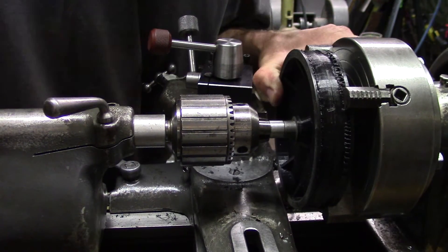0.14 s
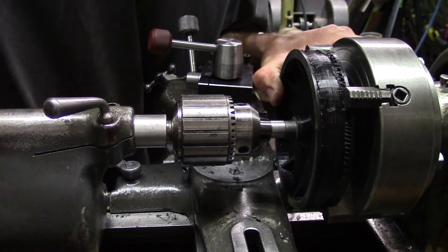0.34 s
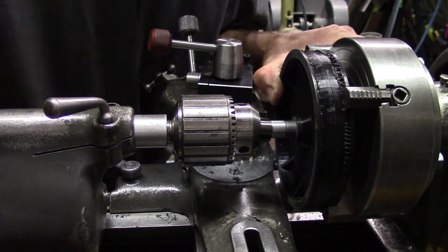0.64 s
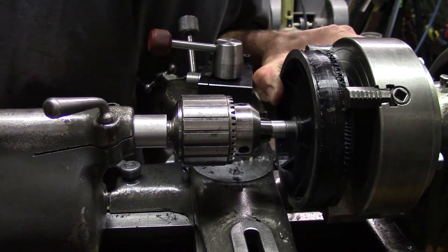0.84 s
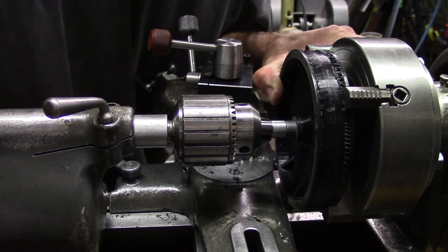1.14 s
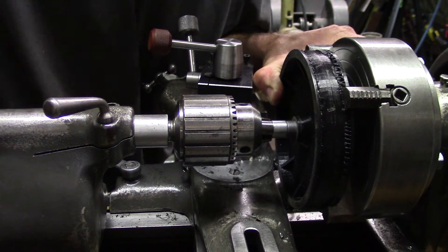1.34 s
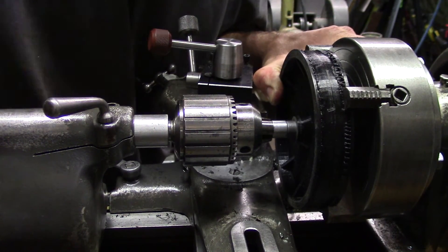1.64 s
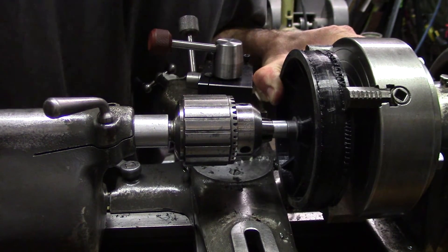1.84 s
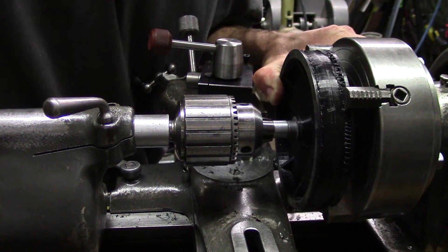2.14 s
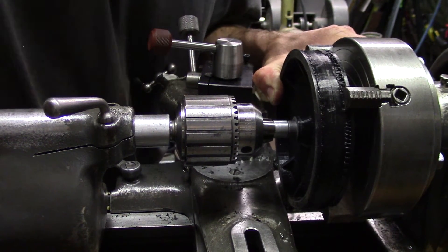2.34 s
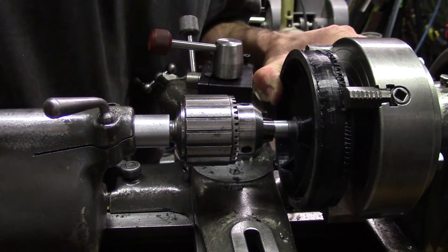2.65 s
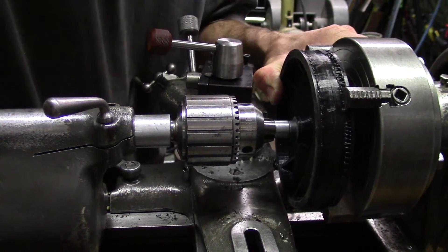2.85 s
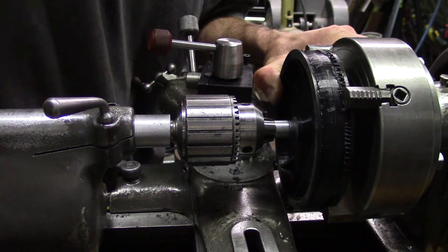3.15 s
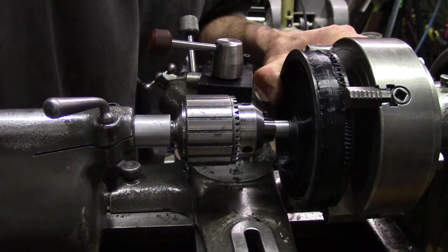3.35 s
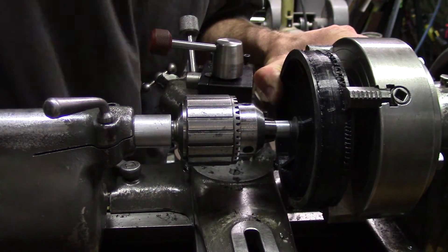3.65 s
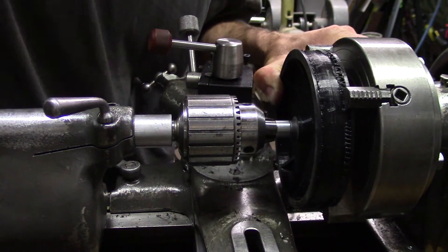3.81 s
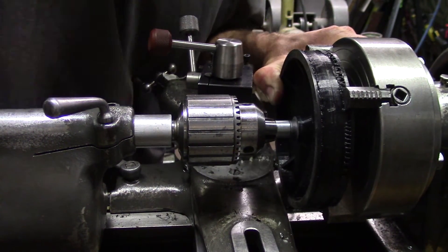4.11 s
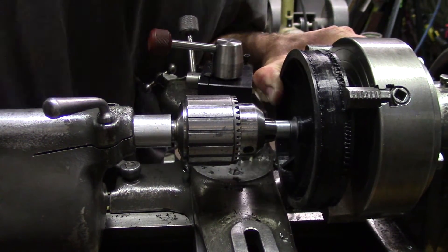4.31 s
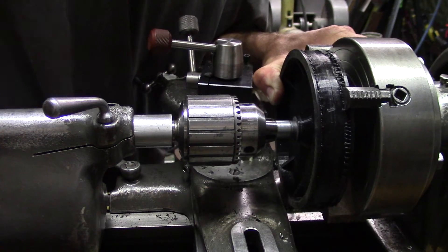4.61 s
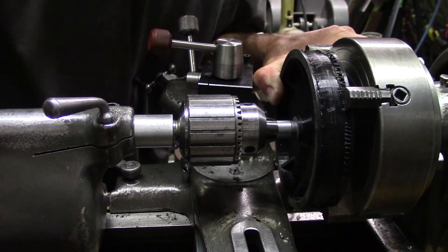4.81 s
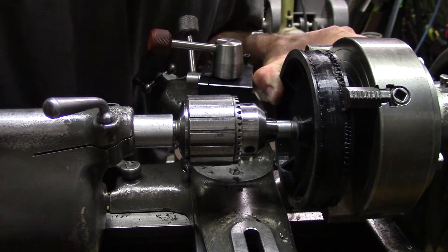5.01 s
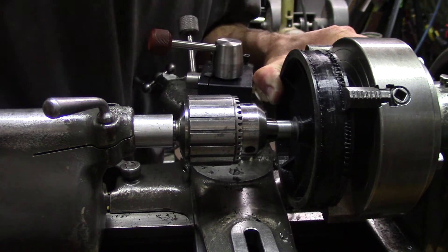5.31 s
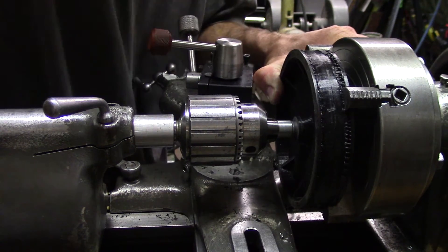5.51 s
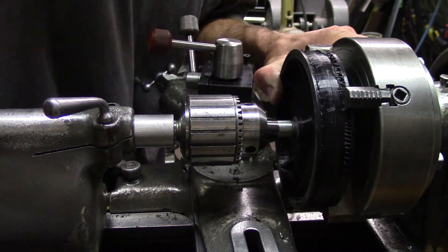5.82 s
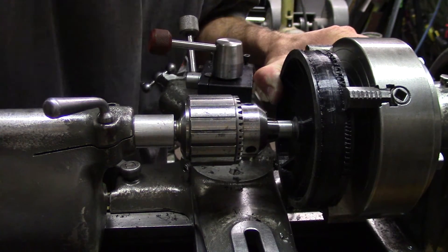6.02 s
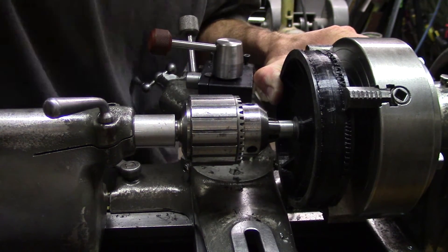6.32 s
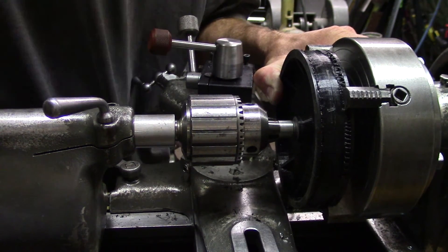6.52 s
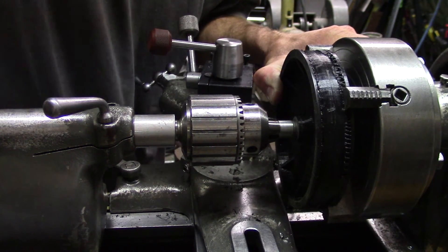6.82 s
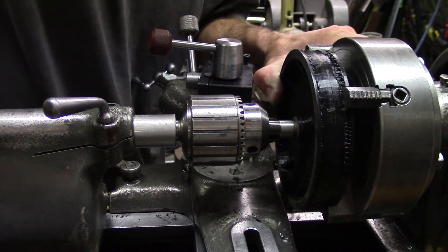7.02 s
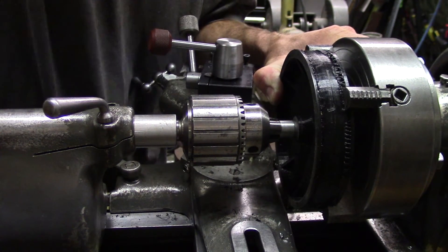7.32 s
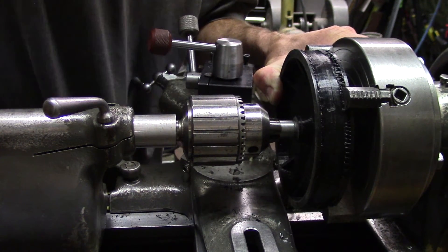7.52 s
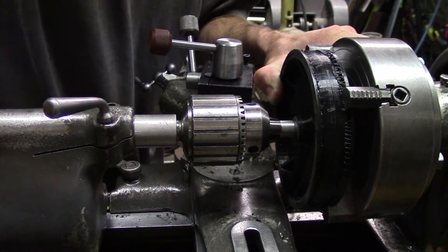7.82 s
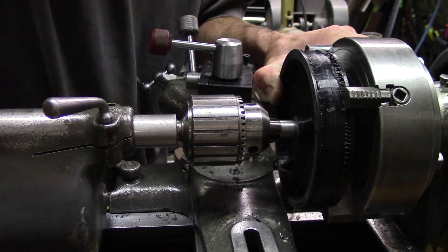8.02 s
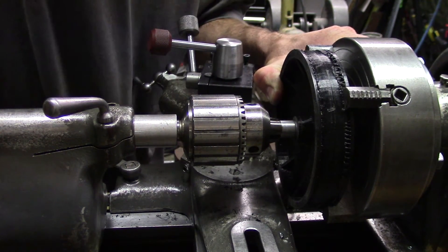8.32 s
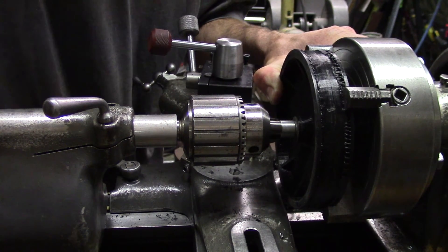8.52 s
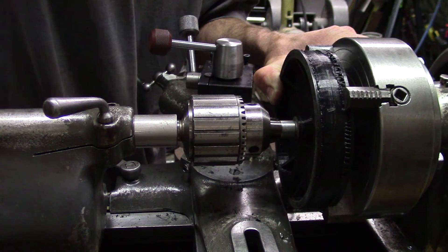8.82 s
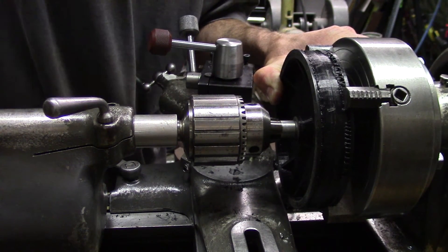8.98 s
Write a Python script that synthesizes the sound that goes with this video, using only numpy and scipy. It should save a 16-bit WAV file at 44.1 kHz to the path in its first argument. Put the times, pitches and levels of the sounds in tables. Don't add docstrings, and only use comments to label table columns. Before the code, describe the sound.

A quiet workshop hum with soft hiss runs throughout, heard in close stereo by a small camera. Sleeves rustle, then at 0.3 s a hard hollow knock jolts a plastic wheel in a lathe chuck, with a tiny crack, steel ping and low iron ring. A loose handle jingles at 0.7. More knocks come at 1.2 and 2.2, then a softer one at 2.8 among sharp ticks. Around 3.3 a busy scrape, thud and metallic click break in, with faint squeaks nearby. Knocks follow at 3.7 and, stronger, 4.7; a low panel drone swells around 4. Duller ones fall at 5.4 and 6.2, with breathy high squeaks at 5.5 to 5.9 and a short thud at 6.3. A very loud knock at 7.0 has a weak follower at 7.3; after light jingling and a nudge at 7.9, the loudest hits at 8.2, limited, then small rustles settle into hum.

```python
import sys
import numpy as np
from scipy import signal
from scipy.fft import rfft, irfft
from scipy.io import wavfile
from scipy.ndimage import uniform_filter1d, minimum_filter1d

SR = 44100
rng = np.random.default_rng(int(sys.argv[2]) if len(sys.argv) > 2 else 0)


def wrap_up_sound(samples):
    columns = np.atleast_2d(samples).T
    tamed = np.clip(columns, -1, 1)
    steps = np.round(tamed * 32767).astype(np.int16)
    wavfile.write(sys.argv[1], SR, steps)


def decibels_to_gain(level_db):
    exponent = np.asarray(level_db, float) / 20
    return 10 ** exponent


N = 403503
T = np.arange(N) / SR
TAIL = T[:SR]

# start in seconds, peak in dB, weight of the band below 330 Hz in dB, weight of
# the band above 1100 Hz in dB, crack in dB.
SLIP_EVENTS = [(0.305, -3.5, -11.5, -7.5, -24), (1.202, -10.5, -6.5, -12.5, -30),
               (2.162, -10, -8.5, -12, -22), (2.789, -18.5, -2.5, -14, -23.5),
               (3.66, -13.5, -1.5, -12.5, -24), (4.665, -7, -9, -11, -26),
               (5.422, -20.5, 0.5, -22.5, -23.5), (6.157, -17, -0.5, -20.5, -22.5),
               (7.036, -1, -11.5, -8, -25), (7.262, -28, 5, -22, -17.5), (8.168, 4, -16, -6, -22.5)]


def unit(x):
    return x / np.sqrt(np.mean(x ** 2))


def band(x, lo_hz, hi_hz, order=2):
    edges = [lo_hz, min(hi_hz, 0.45 * SR)]
    return signal.sosfilt(signal.butter(order, edges, "band", fs=SR, output="sos"), x)


def shade(x, table):
    hz, db = np.transpose(table)
    f = np.maximum(np.arange(len(x) // 2 + 1) * SR / len(x), 1)
    return irfft(rfft(x) * decibels_to_gain(np.interp(np.log(f), np.log(hz), db)), len(x))


def fade(t60):
    return np.exp(-np.log(1000) * TAIL / t60)


def tone(hz):
    return np.sin(2 * np.pi * hz * TAIL)


def add_at(out, s, sound):
    start = int(s * SR)
    out[start:start + SR] += sound


def play(times, dbs, response):
    train = np.zeros(N)
    np.add.at(train, (np.asarray(times) * SR).astype(int), decibels_to_gain(np.asarray(dbs)))
    return signal.fftconvolve(train, response / np.abs(response).max())[:N]


def walk(rate):
    k = int(SR / rate)
    levels = np.repeat(rng.standard_normal(N // k + 1), k)
    return unit(uniform_filter1d(levels, k)[:N])


def swell(middle, length, db):
    out = np.zeros(N)
    near = slice(max(int((middle - length) * SR), 0), int((middle + length) * SR))
    out[near] = decibels_to_gain(db) * np.exp(-(3.8 * (T[near] - middle) / length) ** 2)
    return out


def hum(hz, wander):
    cycles = np.cumsum(hz * (1 + wander * walk(13))) / SR
    return np.sqrt(2) * np.sin(2 * np.pi * cycles)


def shop():
    # pitch in Hz, level in dB per Hz.
    air_colour = [(20, -24.5), (95, -12.5), (150, -3), (330, -5.5), (1040, -13.5), (7510, -27),
                  (13600, -39.5), (16000, -56.5)]
    # middle in seconds, length in seconds, rumble in dB, drone in dB.
    leans = [
        (0.0, 0.46, -78, -82),
        (3.362, 0.54, -74, -66.5),
        (3.949, 0.99, -64, -62),
        (4.367, 0.34, -73, -63),
        (4.859, 0.43, -75.5, -79),
        (8.72, 0.55, -83, -71.5),
    ]
    air = unit(shade(rng.standard_normal(N), air_colour)) * decibels_to_gain(-60 + 0.62)
    capsule_hiss = decibels_to_gain(-85.5) * unit(band(rng.standard_normal(N), 13000, 15900))
    s, db, bed_db = np.transpose(SLIP_EVENTS)[:3]
    kick_db, rise_s, t60_s = -43, 0.14, 1.6
    panel = decibels_to_gain(-75.5) + play(s, db + bed_db + kick_db, (1 - np.exp(-TAIL / rise_s)) * fade(t60_s))
    bench = decibels_to_gain(-82.5)
    for middle, length, rumble_db, drone_db in leans:
        panel = panel + swell(middle, length, drone_db)
        bench = bench + swell(middle, length, rumble_db)
    panel_drone = panel * decibels_to_gain(3.2 * walk(20)) * hum(152, 0.035)
    bench_rumble = bench * decibels_to_gain(3 * walk(10)) * hum(80, 0.06)
    return air + capsule_hiss + panel_drone + bench_rumble


def scuff():
    # middle in seconds, length in seconds, level in dB, low part in dB.
    slides = [(0.0, 0.31, -70.5, 8.5), (0.16, 0.13, -77.5, 18), (0.505, 0.13, -71.5, 8),
              (0.637, 0.1, -67, 2), (0.671, 0.044, -67, 8), (0.964, 0.071, -67.5, 8.5),
              (1.622, 0.081, -70.5, -3), (1.758, 0.043, -71.5, -13), (1.953, 0.02, -80, 25),
              (2.418, 0.076, -70, -1), (2.65, 0.17, -70, -8), (3.028, 0.15, -66.5, -0.5),
              (3.068, 0.061, -59.5, 3.5), (3.27, 0.18, -70, -1), (3.342, 0.1, -58, -1),
              (4.014, 0.066, -76, -9), (4.242, 0.081, -70, -4), (4.766, 0.33, -80, 17.5),
              (4.956, 0.096, -65, 0), (5.275, 0.054, -65.5, -14), (5.657, 0.14, -67.5, 7.5),
              (5.932, 0.12, -70.5, 0), (6.273, .05, -72, 12), (6.473, 0.088, -68, -7),
              (7.454, 0.04, -68, -13), (7.842, 0.074, -66.5, 3), (8.057, 0.039, -72, 4),
              (8.285, 0.096, -66, -11), (8.473, 0.051, -68.5, 7), (8.687, 0.068, -72.5, 6)]
    rustle_db, rustle_low_db, hands_rest_s, rest_db = -77, -4.5, 8.72, -15.5
    grain = rng.standard_normal((2, N)) * decibels_to_gain(1.5 * walk(90))
    resting = np.clip((T - hands_rest_s) / 0.091, 0, 1)
    high = decibels_to_gain(rustle_db + rest_db * resting)
    low = high * decibels_to_gain(rustle_low_db)
    for s, length, db, low_db in slides:
        high = high + swell(s, length, db)
        low = low + swell(s, length, db + low_db)
    return high * unit(band(grain[0], 5300, 11500)) + low * unit(band(grain[1], 1300, 3900))


def ticks():
    # start in seconds, peak in dB, low part in dB, t60 in seconds.
    contacts = [(0.1531, -57, -11, 0.03), (0.406, -61, 19.5, 0.062), (0.4948, -60, -3, 0.03),
                (1.2764, -65, 12, 0.03), (1.3314, -58, 13, 0.03), (1.575, -60.5, 5, 0.034),
                (1.9514, -78, -5, 0.038), (2.5155, -67, 22, 0.024), (2.7557, -57, 19.5, 0.03),
                (2.823, -49, 6, 0.024), (2.8304, -43.5, 8.5, 0.09), (2.8911, -42.5, 8.5, 0.03),
                (3.0599, -48, -9, 0.039), (3.3169, -42, 2, 0.043), (3.3278, -44, -20, 0.024),
                (3.3438, -33, 5.5, 0.055), (3.795, -54.5, 10, 0.029), (3.9884, -60, -3, 0.029),
                (4.3236, -64.5, 16, 0.033), (5.2734, -52, -14, 0.035), (5.515, -46, 0, 0.043),
                (5.63, -55.5, 14.5, 0.044), (5.656, -49, -2, 0.03), (5.6838, -51, 9, 0.027),
                (6.266, -62.5, 4, 0.03), (6.6274, -66, 14.5, 0.03), (6.7514, -58, 9, 0.045),
                (7.1302, -53, -2, 0.03), (7.893, -75, 2, 0.03), (8.4554, -52, -10.5, 0.03)]
    out = np.zeros(N + SR)
    for s, db, low_db, t60 in contacts:
        noise = rng.standard_normal((2, SR))
        burst = unit(band(noise[0], 4800, 13500)) + decibels_to_gain(low_db) * unit(band(noise[1], 1200, 6300))
        tail = fade(0.013) + decibels_to_gain(-6) * fade(max(t60, 0.004))
        add_at(out, s, decibels_to_gain(db - 10.5) * burst * tail)
    return out[:N]


def ring(lo_hz, hi_hz):
    wheel_hz = [277, 519, 700, 857, 921, 1255, 1200, 1550, 1895]
    bed_hz = [154, 207, 277, 357, 392, 455, 519, 577, 683, 764, 921, 943, 1175, 1565]
    # level in dB, t60 in seconds, rise in cycles.
    wheel_modes = [(13, 0.062, 1), (4.5, 0.19, 5.5), (7, 0.045, 3.6), (9.5, 0.029, 0.9), (6, 0.054, 0.95),
                   (-3, 0.12, 2.5), (1, 0.094, 3.5), (8, 0.032, 1.7), (-10.5, 0.095, 5.7)]
    # level in dB, t60 in seconds.
    bed_modes = [(-3.5, 0.27), (-9.5, 0.81), (-13, 0.14), (-5.5, .3), (0.5, 0.48), (-3, 0.27), (1.5, 0.19),
                 (-11, 0.55), (-22, 0.11), (-9, 0.19), (-10.5, 0.25), (-17.5, 0.4), (-7, 0.4), (-9.5, 0.16)]
    # low Hz, high Hz, level in dB, t60 in seconds.
    crowd = [(141, 164, -15.5, 0.44), (201, 280, -19, 0.65), (327, 500, -15.5, 0.55),
             (667.4, 870, -12, 0.2), (795, 1200, -13, 0.12), (1110, 1400, -11, 0.25),
             (1350, 1880, -13, 0.15)]
    bed_db, bed_rise_cycles, bed_damp = -6.5, 6.7, 0.88
    modes = [(1, hz, *mode) for hz, mode in zip(wheel_hz, wheel_modes)]
    for k, (hz, (db, t60)) in enumerate(zip(bed_hz, bed_modes)):
        modes.append(((-1) ** k, hz, db + bed_db, bed_damp * t60, bed_rise_cycles))
    out = np.zeros(SR)
    for sign, hz, db, t60, rise in modes:
        if lo_hz <= hz < hi_hz:
            fill = 1 - np.exp(-(TAIL * hz / rise) ** 2)
            out += sign * decibels_to_gain(db) * fill * fade(t60) * tone(hz)
    for low_hz, high_hz, db, t60 in crowd:
        if lo_hz <= np.sqrt(low_hz * high_hz) < hi_hz:
            fill = 1 - np.exp(-(TAIL / 0.011) ** 2)
            grain = unit(band(rng.standard_normal(SR), low_hz, high_hz, order=4))
            out += decibels_to_gain(db) * fill * fade(t60) * grain
    return out


def crack(force_db, level_db):
    # pitch in Hz, level in dB per Hz.
    crack_colour = [(1900, -32), (2500, -6), (3100, -5), (3700, -14.5), (6000, -18.5), (9000, -22),
                    (12000, -30), (16000, -49)]
    dull_hz, dull_slope = 3956, 0.92
    colour = [(hz, g - (hz > dull_hz) * dull_slope * (force_db + 10)) for hz, g in crack_colour]
    grit = unit(shade(rng.standard_normal(SR), colour))
    tail = fade(0.016) + decibels_to_gain(-17.5) * fade(0.13)
    return decibels_to_gain(level_db - 2) * grit * np.minimum(TAIL / 0.001, 1) * tail


def ping(db):
    # pitch in Hz, level in dB, t60 in seconds.
    fitting = [(2940, 0.5, .035), (5090, -1.5, .035), (6260, -9.5, .025), (7600, -9, 0.025),
               (9100, -6.5, .025)]
    share_db = 4 * rng.uniform(-1, 1, len(fitting))
    out = np.zeros(SR)
    for (hz, mode_db, t60), extra_db in zip(fitting, share_db):
        out += decibels_to_gain(db - 7.5 + mode_db + extra_db) * fade(t60) * tone(hz)
    return out


def knocks():
    # start in seconds, peak in dB.
    touches = [
        (4.326, -58),
        (6.265, -47.5),
    ]
    s, db, bed_db, ring_top_db, crack_db = np.transpose(SLIP_EVENTS)
    start = s - 0.0006
    ring_mid_db = db * (1 - 0.4) - 16.5
    ring_low = play(start, db + bed_db, ring(0, 330))
    ring_mid = play(start, ring_mid_db, ring(330, 620))
    ring_upper = play(start, db, ring(620, 1100))
    ring_top = play(start, db + ring_top_db, ring(1100, 3000))
    top = np.zeros(N + SR)
    for at, force_db, level_db in zip(s, db, db + crack_db):
        add_at(top, at + 0.00056, crack(force_db, level_db))
        add_at(top, at, ping(-38 + 0.4 * force_db))
    for at, level_db in touches:
        add_at(top, at, ping(level_db))
    return ring_low + ring_mid + ring_upper + ring_top + top[:N]


def bumps():
    # start in seconds, peak in dB, pitch in Hz, t60 in seconds.
    thuds = [(0.569, -32, 278, 0.091), (0.634, -42, 277, 0.12), (1.493, -32, 288, 0.096),
             (2.329, -41, 278, 0.11), (2.947, -41, 243, 0.11), (3.33, -13.5, 280, 0.027),
             (3.334, -40, 151.1, 0.49), (3.359, -29, 278, 0.049), (3.37, -44, 209.4, 0.33),
             (3.633, -26, 283, 0.1), (4.335, -46.5, 152, 0.18), (4.341, -30, 291, 0.071),
             (4.82, -33, 247, 0.11), (5.634, -34, 150, 0.1), (6.266, -15, 276, 0.044),
             (7.45, -35.5, 151, 0.1), (7.84, -43, 277.2, 0.1), (7.841, -48.5, 480, .08),
             (7.889, -42, 560, 0.06), (8.421, -40, 207.5, 0.12), (8.769, -36.5, 143.4, 0.11)]
    # start in seconds, t60 in seconds, level in dB, top in Hz.
    drags = [
        (1.945, 0.22, -53, 1500),
        (2.752, 0.054, -49, 1200),
        (3.322, 0.18, -42, 1287),
        (3.345, 0.25, -39.5, 420),
        (3.636, 0.097, -43, 953),
        (4.185, .04, -54, 900),
        (6.265, 0.032, -52, 1300),
        (7.893, 0.02, -39.5, 2300),
        (7.895, 0.16, -45.5, 652),
        (8.447, 0.11, -54.5, 1800),
    ]
    out = np.zeros(N + SR)
    for s, db, hz, t60 in thuds:
        fill = 1 - np.exp(-TAIL * hz / 4.5)
        add_at(out, s, decibels_to_gain(db + 1.5) * fill * fade(t60) * tone(hz))
    for s, t60, db, top_hz in drags:
        grit = unit(band(rng.standard_normal(SR), 150, top_hz, order=3))
        add_at(out, s, decibels_to_gain(db) * np.minimum(TAIL / 0.001, 1) * fade(t60) * grit)
    return out[:N]


def handle():
    # pitch in Hz, width in Hz, level in dB.
    handle_modes = [(1900, 60, -8), (2925, 24, 0), (3010, 40, -10), (3720, 40, -3), (3960, 40, -7)]
    # middle in seconds, length in seconds, level in dB, upper modes in dB.
    bouts = [(0.737, 0.093, -56, -2), (1.347, 0.034, -60.5, -13), (1.574, 0.046, -67, 4),
             (1.956, 0.063, -65, 0), (3.103, 0.065, -56.5, -8), (3.138, .13, -75, -15),
             (3.99, .07, -66.5, 0), (4.327, .04, -65, -10), (5.066, 0.16, -68, -1.5),
             (5.098, 0.041, -67, 0), (5.23, 0.24, -74, 3), (7.505, 0.19, -68, -9.5), (7.727, 0.25, -70, -6),
             (8.36, .1, -64.5, -2), (8.416, 0.067, -69, 2)]
    taps = rng.standard_normal(N) * (rng.random(N) < 900 / SR)
    lower_gain = sum(swell(s, length, db) for s, length, db, _ in bouts)
    upper_gain = sum(swell(s, length, db + upper_db) for s, length, db, upper_db in bouts)
    out = np.zeros(N)
    for hz, width, db in handle_modes:
        edges = hz - width / 2, hz + width / 2
        gain = upper_gain if hz > 3300 else lower_gain
        steady_level = band(taps, *edges, order=1).std()
        out += decibels_to_gain(db) * band(gain * taps, *edges, order=1) / steady_level
    return out


def squeak():
    # start in seconds, length in seconds, pitch in Hz, level in dB, lean to the lower partner in dB.
    squeaks = [
        (0.81, 0.17, 10350, -70, -2),
        (2.16, .125, 9080, -65, 9),
        (2.98, .07, 10000, -70, 2),
        (3.19, .13, 11800, -71, 1),
        (3.43, 0.038, 9700, -64, 0),
        (5.52, .2, 10050, -67, 0),
        (5.76, .185, 10100, -67, -4),
    ]
    edge_s, fade_db_s, sag_hz_s, lower_db = 0.021, 28, 1500, -5
    partners = (0.735, 0, 450), (1, -0.5, 1004), (1.12, -11, 900), (1.42, -12, 900)  # ratio, dB, width in Hz
    out = np.zeros(N + SR)
    for s, length, hz, level_db, lean_db in squeaks:
        gate = np.clip(np.minimum(TAIL, length - TAIL) / edge_s, 0, 1)
        gate = gate * decibels_to_gain(level_db - fade_db_s * TAIL)
        cycles = (hz - sag_hz_s * TAIL / 2) * TAIL
        whistle = np.zeros(SR)
        for ratio, db, width_hz in partners:
            breath = unit(uniform_filter1d(rng.standard_normal(SR), int(SR / width_hz)))
            share_db = lower_db + lean_db if ratio < 1 else -lean_db * (ratio > 1)
            whistle += decibels_to_gain(db + share_db) * breath * np.sin(2 * np.pi * ratio * cycles)
        add_at(out, s, gate * whistle)
    return out[:N] * decibels_to_gain(1.7 * walk(40))


def room(x):
    # pitch in Hz, level in dB, t60 in seconds.
    echo_bands = [(165, -16.5, 0.51), (204, -17, 0.42), (342, -24.5, 0.64), (616, -36.5, 0.31),
                  (1200, -18, 0.22), (2400, -23, 0.57), (5070, -11, 0.26), (10000, -14.5, .2)]
    echo = np.zeros(SR)
    for hz, db, t60 in echo_bands:
        noise = unit(band(rng.standard_normal(SR), hz / 1.3, hz * 1.197))
        echo += decibels_to_gain(db - 39.5) * noise * fade(t60)
    arrive = 1 - np.exp(-TAIL / 0.0013)
    return signal.fftconvolve(x, echo * arrive)[:N]


def scene():
    # pitch in Hz, side minus mid in dB.
    port_width = [(60, -6), (110, -23), (200, -14), (500, -6.5), (1290, -6), (3200, -9), (8120, -14),
                  (15000, -8.5)]
    near = scuff() + ticks() + knocks() + bumps() + handle() + squeak()
    near = band(near + room(near), 120, 15500, order=4)
    mid = near + shop()
    scatter = rng.standard_normal(400) * fade(0.027)[:400]
    scatter = scatter / np.linalg.norm(scatter)
    other = decibels_to_gain(-26) * signal.fftconvolve(near, scatter)[:N] + shop()
    treble = band(mid, 5000, 16000, order=1)
    side = shade(other, port_width) + decibels_to_gain(-22) * treble
    side = side + decibels_to_gain(-15.5) * signal.fftconvolve(treble, scatter)[:N]
    return np.array([mid + side, mid - side])


def low_pass(x):
    return signal.sosfilt(signal.butter(12, 16510, fs=SR, output="sos"), x)


def record(dry):
    ceiling, reach = 0.93, int(0.004 * SR)
    need = ceiling / np.maximum(np.abs(dry).max(axis=0), ceiling)
    gain = uniform_filter1d(minimum_filter1d(need, 2 * reach), reach)
    top_cut = signal.ellip(8, 0.2, 60, 15800, fs=SR, output="sos")
    held = gain * signal.sosfilt(top_cut, dry)
    return low_pass(held - 0.019 * held ** 2)


dry = scene()
out = record(dry)
wrap_up_sound(out)
```